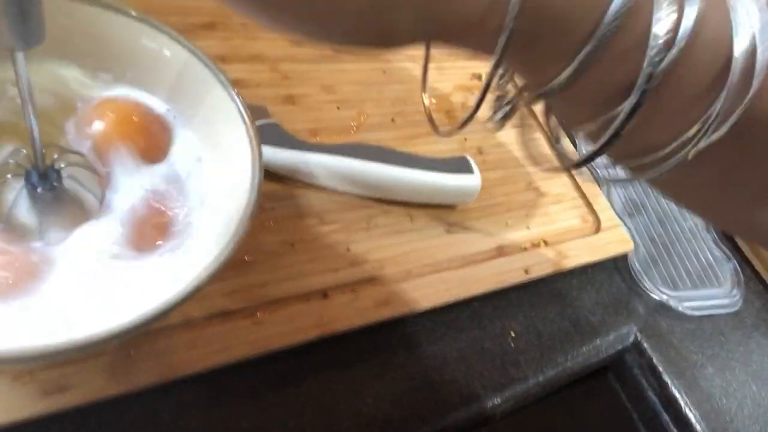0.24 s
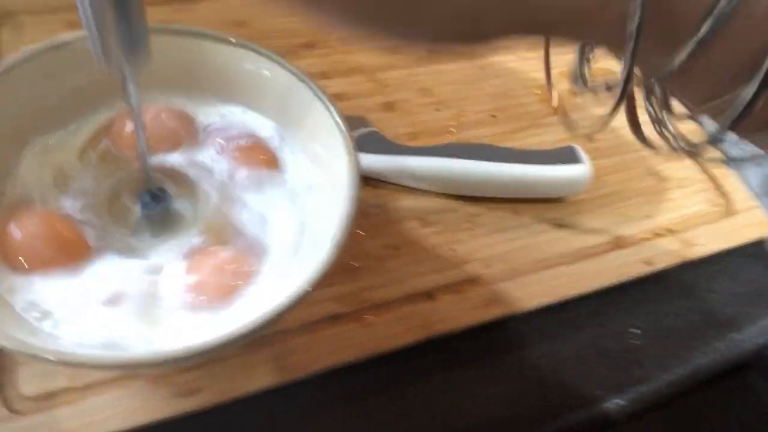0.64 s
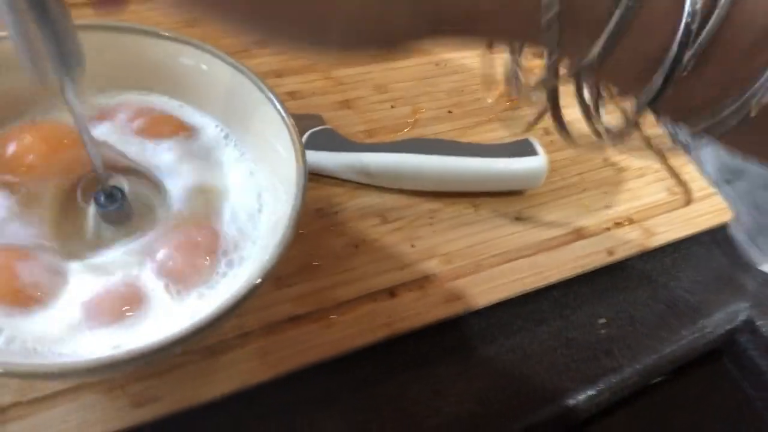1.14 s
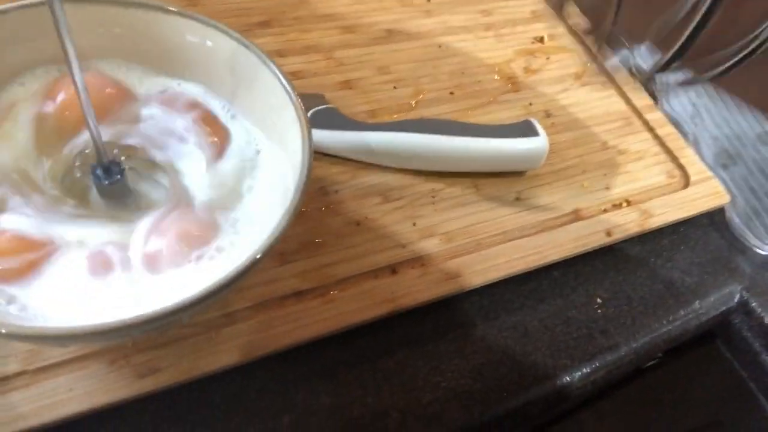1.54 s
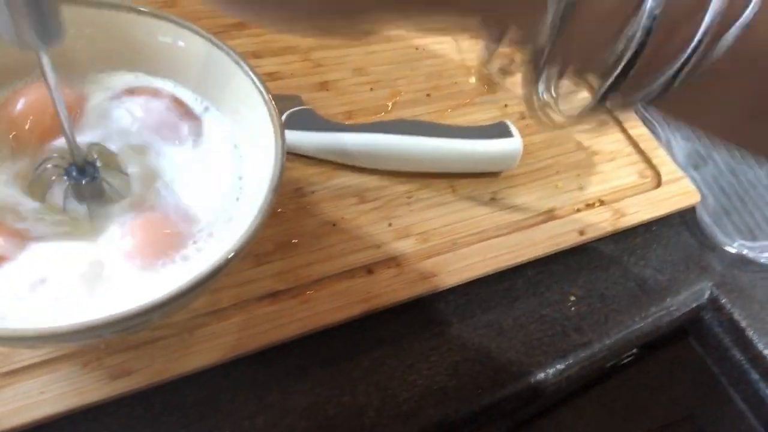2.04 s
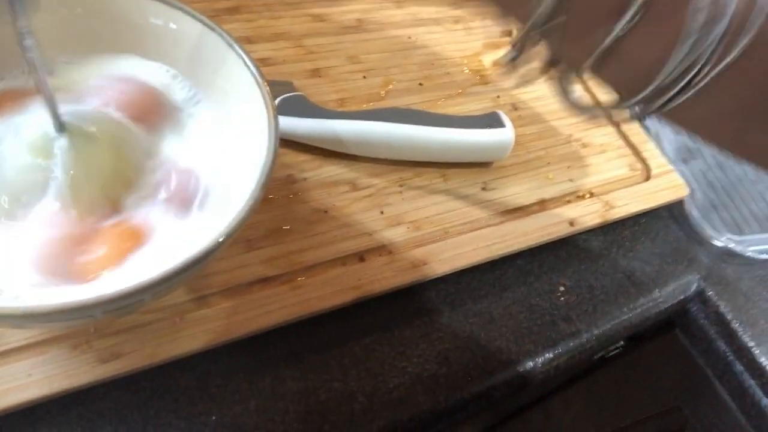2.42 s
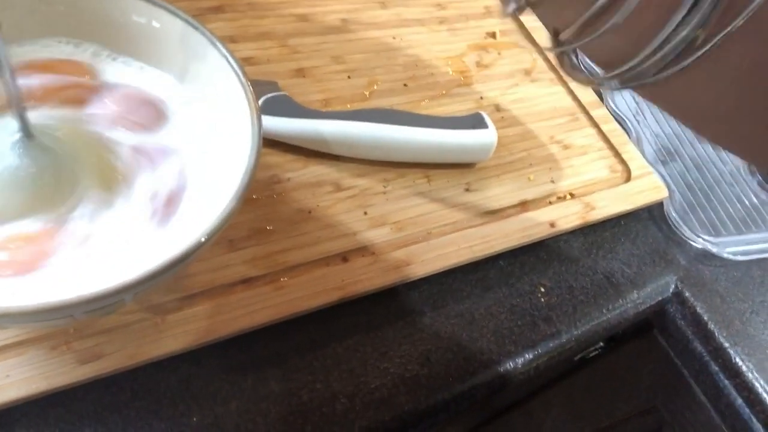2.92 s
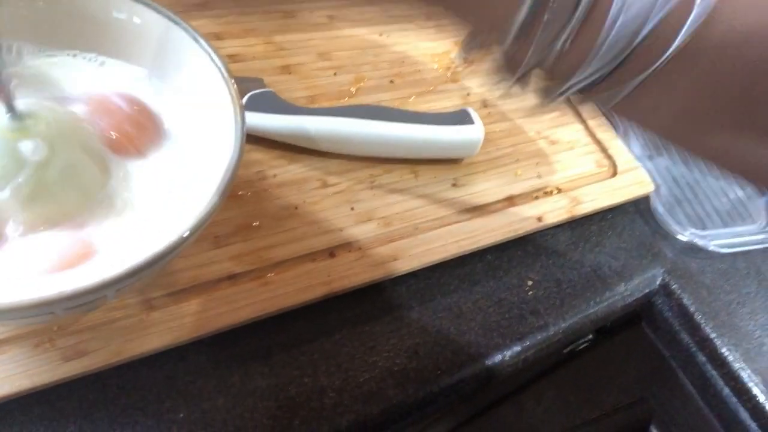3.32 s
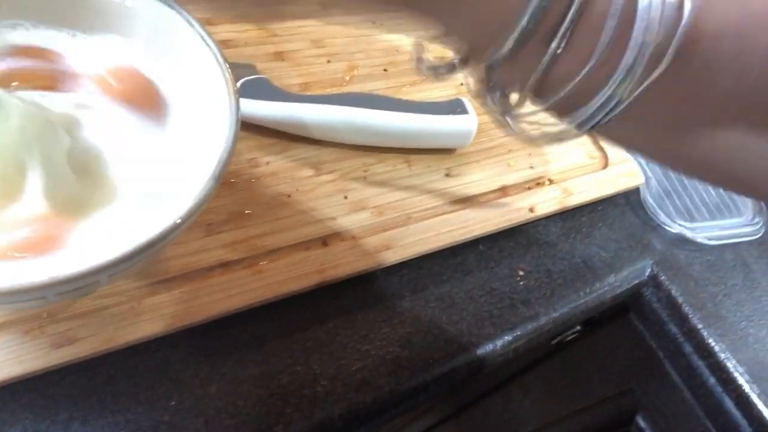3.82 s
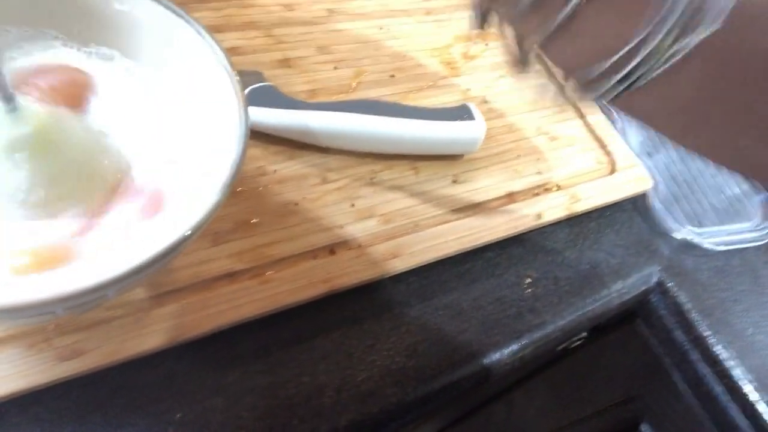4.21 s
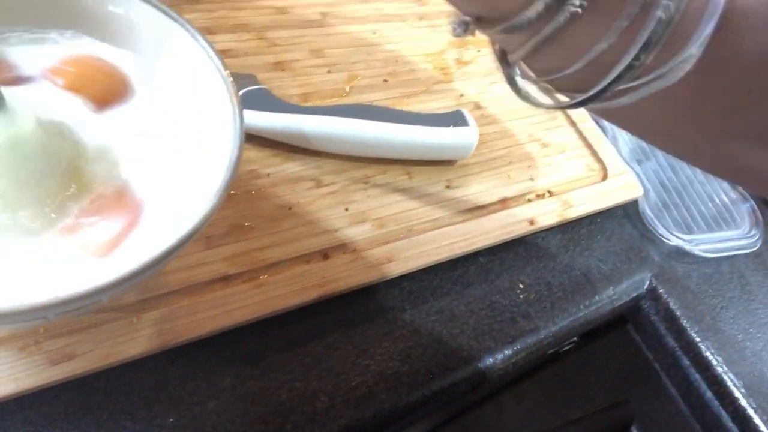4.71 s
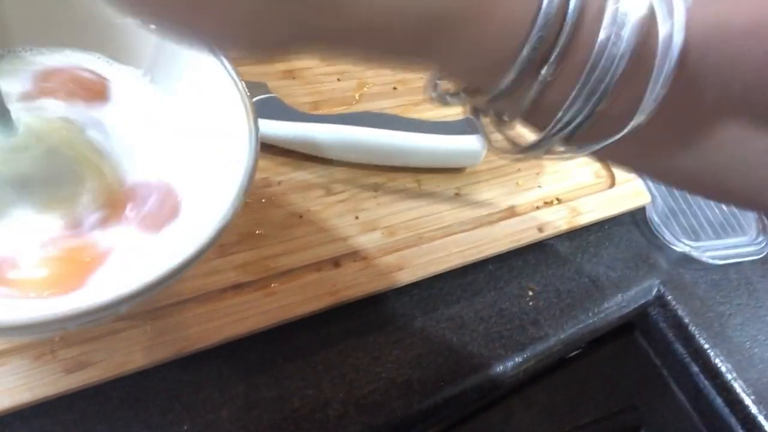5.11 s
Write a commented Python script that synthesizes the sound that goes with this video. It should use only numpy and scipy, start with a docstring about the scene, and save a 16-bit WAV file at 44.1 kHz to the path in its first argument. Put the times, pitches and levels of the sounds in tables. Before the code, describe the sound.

Wire whisk clacks in quickening rhythm against a pan of eggs and milk, with wet sloshing, hollow board knocks and faint bangle jingle.

```python
"""A faint knock and light clacks over wet sloshing open the scene, then the beating grows faster and harder.
Eggs and milk are beaten with a push-down whisk in a pan on a wooden board in a kitchen.
Wires clack as bursts of contacts through wall, rim and wire tones; the pan knocks as falling chirps.
The liquid is a patter of tiny noise snaps with a few rising bubble tones; thin metal bangles jingle on
the cook's wrist as randomly tapped high modes. A short room echo and a faint steady hiss lie behind it all."""
import sys
import numpy as np
from scipy import signal
from scipy.fft import rfft, irfft
from scipy.io import wavfile
from scipy.ndimage import uniform_filter1d

SR = 44100
rng = np.random.default_rng(int(sys.argv[2]) if len(sys.argv) > 2 else 0)


def int16_out(signal):
    """Quantize to a 16-bit WAV file."""
    q = np.round(np.clip(np.atleast_2d(signal).T, -1, 1) * 32767)
    wavfile.write(sys.argv[1], SR, q.astype(np.int16))


N = 236236


def undb(db):
    """Decibels to gain."""
    return 10 ** (np.asarray(db) / 20)


def unit(x):
    """Scale to rms 1."""
    return x / np.sqrt(np.mean(x ** 2) + 1e-20)


def burst(x):
    """Scale a short sound to the energy of 5 ms at rms 1."""
    return x / np.sqrt(np.sum(x ** 2) / (0.005 * SR) + 1e-20)


def curve(rows):
    """Join (s, value) rows by straight lines."""
    return np.interp(np.arange(N) / SR, *np.transpose(rows))


def add(out, s, x):
    """Mix x into out at time s."""
    i = max(int(s * SR), 0)
    out[i:i + len(x)] += x[:max(len(out) - i, 0)]


def gains(points, size):
    """Gain of a (Hz, dB) colour at the bins of a transform."""
    hz, db = np.transpose(points)
    bins_hz = np.fft.rfftfreq(size, 1 / SR)
    return undb(np.interp(np.log(bins_hz + 1), np.log(hz), db))


def colour(x, points):
    """Give a steady sound a colour."""
    return irfft(rfft(x) * gains(points, len(x)), len(x))


def impulse(points, size=4096):
    """The causal (minimum-phase) pulse that has this colour."""
    cepstrum = irfft(np.log(gains(points, size)))
    cepstrum[1:size // 2] *= 2
    cepstrum[size // 2 + 1:] = 0
    return irfft(np.exp(rfft(cepstrum)))


def band(x, lo_hz, hi_hz, order=2):
    """Causal band-pass."""
    sos = signal.butter(order, [lo_hz, hi_hz], "band", fs=SR, output="sos")
    return signal.sosfilt(sos, x)


def ring(hz, t60, size=4096):
    """One mode that fades by 60 dB in t60 seconds."""
    t = np.arange(size) / SR
    return np.sin(2 * np.pi * hz * t) * np.exp(-np.log(1000) * t / t60)


def disperse(x, lag_ms, corner_hz):
    """Bending waves: low tones travel slower, so a blow becomes a quick falling chirp."""
    hz = np.fft.rfftfreq(len(x), 1 / SR)
    phase = 2 * np.pi * lag_ms / 1000 * corner_hz * np.arctan(hz / corner_hz)
    return irfft(rfft(x) * np.exp(-1j * phase), len(x))


def chatter(ms, rebound=0.72, grit=0.083, count=7, size=4096):
    """Contact force: one wire lands, the others follow within a few ms and scrape a little."""
    age = np.arange(size) / SR * 1000 / ms
    force = grit * rng.standard_normal(size) * np.exp(-age ** 2)
    force[0] += 1
    late = rng.uniform(0.05, 1, count)
    force[np.searchsorted(age, late)] += rebound * rng.choice([-1, 1], count) * (1 - late / 2)
    return force


def walk(rate):
    """Random levels 1 / rate s apart, joined by straight ramps; spread near 1."""
    k = int(SR / rate)
    steps = np.repeat(rng.standard_normal(N // k + 1), k)
    return unit(uniform_filter1d(steps, k)[:N])


# Wires hit the pan. Each row: start in seconds, level in dB, rim in dB (relative),
# after-ring in dB (relative), wall pitch in Hz, wire pitch in Hz.
WIRE_CLACKS = [(0.152, -22, -13, -12, 1290, 4490), (0.35, -28, -12, -7, 1340, 4400),
               (0.574, -8.5, -7, -11, 1246, 5000), (0.931, -11.5, -4.5, -10.5, 1206, 4430),
               (1.162, -14, -5.5, -14, 1236, 4790), (1.411, -8.5, -7.5, -10.5, 1280, 4840),
               (1.646, -7, -8, -13, 1292, 4800), (1.885, -20.5, -26, -22, 1664, 4060),
               (2.129, -8.5, -22, -20, 1185, 5000), (2.36, -8, -1, -11.5, 1182, 5240),
               (2.591, -7, 4.5, -5.5, 1273, 4580), (2.824, -8.5, 5.5, -0.5, 1675, 4990),
               (3.029, -5, -4, -2, 1426, 5320), (3.406, -11, 1.5, -13, 1048, 5250),
               (3.604, -7.5, -1, -10.5, 1260, 5320), (3.782, -12, 0, -28, 1164, 5040),
               (3.974, -11, 1, -10, 1064, 5520), (4.098, -22.5, 0.5, -20, 1260, 4380),
               (4.128, -14.5, 0.5, -8, 1130, 5260), (4.259, -14.5, -4, -11, 1250, 4400),
               (4.456, -5, 0.5, -12, 1167, 4520), (4.621, -8.5, -0.5, -4.5, 1237, 4020),
               (4.692, -24, 3.5, -15, 1610, 4060), (4.767, -8, 0.5, -15, 970, 5110),
               (4.867, -23.5, -10, -11, 1330, 4610), (4.894, -25, -3, -5, 1280, 3840),
               (5.05, -14, -4, -24, 1263, 4600), (5.081, -10.5, -1, -4.5, 1200, 4800),
               (5.244, -7.5, -0.5, -12, 1180, 4580)]
# The spot of contact shifts the rim's pitch a little; scatters are in natural-log units.
RIM_HZ, RIM_SCATTER = 2135, 0.047
CHATTER_MS, CHATTER_SCATTER = 5.2, 0.15
# Wires and tick of a firm clack; weaker clacks stir the wires less, a ringing rim sharpens the tick.
FIRM_CLACK_DB, WIRE_DB, TICK_DB = -16, -4.5, -16
WIRE_DB_PER_DB, TICK_DB_PER_RIM_DB = 0.76, 0.4


def clacks():
    """Each contact drives the damped pan wall, its rim and the wires; the sprung wires rattle on after it."""
    out = np.zeros(N)
    for s, db, rim_db, after_db, pan_hz, wire_hz in WIRE_CLACKS:
        rim_hz = RIM_HZ * np.exp(RIM_SCATTER * rng.standard_normal())
        wire_db = WIRE_DB + WIRE_DB_PER_DB * min(db - FIRM_CLACK_DB, 0)
        tick_db = TICK_DB + TICK_DB_PER_RIM_DB * rim_db
        contact_ms = CHATTER_MS * np.exp(CHATTER_SCATTER * rng.standard_normal())
        force = chatter(contact_ms, rebound=0.81, grit=0.23)

        wall = burst(band(force, 762, 1820, order=3))
        wall += undb(-1.5) * burst(ring(pan_hz, t60=0.04))
        wall += undb(-4) * burst(band(force, 293, 1150))
        rim = burst(band(force, 0.87 * rim_hz, 1.22 * rim_hz))
        rim += undb(-3) * burst(ring(rim_hz, t60=0.034))
        wires = burst(band(force, 3705, 5614, order=3))
        wires += undb(-2.5) * burst(ring(wire_hz, t60=0.026))
        tick = burst(band(force, 7850, 10460))
        tick += undb(-27) * burst(band(force, 9700, 11400))

        clack = undb(-3.5) * burst(wall) + undb(rim_db - 8) * burst(rim) + undb(wire_db) * burst(wires)
        add(out, s, undb(db) * disperse(clack + undb(tick_db) * tick, lag_ms=2.51, corner_hz=684))

        # a dense train of faint recontacts repeats the clack's colour
        rattle = rng.standard_normal(len(force)) * np.exp(-np.arange(len(force)) / SR / 0.03)
        after = signal.fftconvolve(clack, rattle / np.linalg.norm(rattle))
        add(out, s + 0.0033, undb(db + after_db - 5.5) * band(after, 740, 4300, order=1))
        # the struck wire sings on under it
        add(out, s, undb(db + wire_db - 28.5) * ring(wire_hz, t60=0.26, size=SR // 4))
    return out


# The pan knocks on the board. Each row: start in seconds, relative level in dB.
BOARD_KNOCKS = [(0.043, -30.5), (0.258, -25), (0.463, -25.5), (0.627, -16.5), (0.771, -32), (0.959, -37),
                (1.517, -32), (1.756, -32), (1.983, -29), (2.228, -32.5), (2.456, -32), (2.672, -25.5),
                (2.863, -14), (3.23, -34), (3.295, -28), (3.472, -16.5), (3.663, -16), (3.853, -18),
                (4.017, -12.5), (4.185, -12.5), (4.34, -13.5), (4.499, -13.5), (4.658, -14.5), (4.815, -13),
                (4.977, -14), (5.134, -12.5), (5.297, -13.5)]
# Colour of a knock before its upper tones are rebalanced. Each row: frequency in Hz, level in dB.
KNOCK_COLOUR = [(30, -53), (70, -13.5), (120, 5), (180, -10), (260, 1.5), (420, 2), (580, 4), (780, -5.5),
                (1150, -1), (1500, -12), (2000, -24), (3500, -35.5), (8000, -34.5), (15000, -64)]
# Upper tones of a firm knock and the whisk's rattle; softer knocks are duller.
FIRM_KNOCK_DB, UPPER_DB, UPPER_DB_PER_DB = -13, 2, 0.4
RATTLE_DB, RATTLE_MS = -12.5, 6


def knocks(rock_db=-7, rock_s=0.003896):
    """A hollow chirp per knock, brighter when it lands hard; the pan rocks once and the whisk rattles with it."""
    out = np.zeros(N)
    lead = 256  # samples of room for the two-way low-pass
    thud = np.roll(impulse(KNOCK_COLOUR), lead)
    low = signal.sosfiltfilt(signal.butter(2, 850, fs=SR, output="sos"), thud)
    body, upper = burst(low), burst(thud - low)
    for s, db in BOARD_KNOCKS:
        upper_db = UPPER_DB + UPPER_DB_PER_DB * (db - FIRM_KNOCK_DB)
        # the pan never lands on quite the same spot
        lag_ms = 3.9 * rng.uniform(0.92, 1.08)
        rock = rock_s * rng.uniform(0.7, 1.5)
        blow = disperse(body + undb(upper_db) * upper, lag_ms, corner_hz=826)
        second = disperse(body, lag_ms, corner_hz=784)
        rattle = band(chatter(RATTLE_MS, rebound=0.6, grit=0.2), 1220, 3600)
        add(out, s - lead / SR, undb(db - 2.5) * blow)
        add(out, s - lead / SR + rock, undb(db + rock_db - 2.5) * second)
        add(out, s, undb(db + RATTLE_DB) * burst(rattle))
    return out


# Between the blows a wire now and then grazes the pan.
GRAZES_PER_S, GRAZE_DB, GRAZE_SCATTER_DB = 3, -41, 3


def grazes(lo_hz=1500, hi_hz=3600):
    """Faint wire ticks at random moments, each band shifted up to half an octave either way."""
    out = np.zeros(N)
    for when, force, spot in rng.random((int(GRAZES_PER_S * N / SR), 3)):
        shift = 2 ** (spot - 0.5)
        tick = burst(band(chatter(ms=3.5), lo_hz * shift, hi_hz * shift))
        add(out, when * N / SR, undb(GRAZE_DB + GRAZE_SCATTER_DB * (2 * force - 1)) * tick)
    return out


# Ring of the filled pan on its board. Each row: frequency in Hz, relative level in dB, t60 in seconds.
PAN_RING = [(118, -17, .3), (252, -21, .25), (345, -21, .12), (394, -18, .25), (524, -17, .4),
            (590, -16, .08), (660, -18, .08), (1023, -17, .2), (1130, -19, .1), (1228, -14, .22),
            (1464, -16, .22), (1660, -22, .15), (2121, -15, .26), (2505, -11, .22), (2690, -24, .15),
            (2820, -21, .15), (3640, -25, .15), (4330, -24, .15), (4505, -16, .2), (4730, -23, .15),
            (5200, -23, .15)]
# Nearby surfaces. Each row: delay in seconds, level in dB.
SURFACES = [(.0035, -42), (.0079, -14.5), (0.0116, -21)]


def pan(blows):
    """Every blow leaves the pan's own modes ringing, and comes back softened from nearby surfaces."""
    modes = sum(undb(db) * ring(hz, t60, size=SR // 2) for hz, db, t60 in PAN_RING)
    direct = blows + undb(-46) * signal.fftconvolve(blows, modes)[:N]
    out = direct.copy()
    soft = band(direct, 62, 6800, order=1)
    for s, db in SURFACES:
        add(out, s, undb(db) * soft)
    return out


# Stirring of the liquid, which also shakes the bangles. Each row: time in seconds, relative slosh level in dB.
STIRRING = [(0, -45), (0.6, -43), (1.3, -47), (2.0, -45), (2.5, -44), (2.9, -39), (3.3, -42), (3.9, -40),
            (4.2, -36), (5.36, -36)]
# Colour of the slosh. Each row: frequency in Hz, level in dB.
SLOSH_COLOUR = [(30, -22), (70, 7.5), (130, -1.5), (200, 5.5), (520, 5.5), (1200, -3), (2500, -11.5),
                (5000, -16), (8000, -13.5), (15000, -19)]
# Air pockets pop in the liquid. Each row: start in seconds, relative level in dB, starting pitch in Hz.
POPS = [(0.269, -40, 2190), (0.291, -32, 1630), (1.9974, -28, 1610), (4.4016, -32, 1300),
        (4.587, -36, 1730)]


def liquid(snaps_per_s=450, spread_db=3):
    """The swirl is a dense patter of wet snaps, each fading over a few ms; larger bubbles ring and rise in pitch."""
    out = np.zeros(N)
    t = np.arange(SR // 10) / SR
    for s, loud in rng.random((int(snaps_per_s * N / SR), 2)):
        snap = rng.standard_normal(400) * np.exp(-t[:400] / 0.002)
        # many quiet snaps, few loud ones
        add(out, s * N / SR, snap * undb(spread_db * min(-np.log(loud), 4)))
    out = unit(colour(out, SLOSH_COLOUR)) * undb(curve(STIRRING) - 3)
    for s, db, hz in POPS:
        bubble = np.sin(2 * np.pi * hz * t * (1 + 3.7 * t)) * np.exp(-t / 0.0052)
        add(out, s, undb(db + 7.5) * bubble)
    return out


# Ring of the bangles. Each row: frequency in Hz, relative level in dB.
HOOP_MODES = [(8274, -68), (8672, -71), (9604, -71), (10061, -68), (10864, -67), (12455, -60), (12640, -62),
              (13011, -58), (13438, -60), (13916, -62), (14772, -58)]
# A jerk of the wrist throws the bangles together. Each row: start in seconds, relative level in dB.
WRIST_JERKS = [(0.572, -42), (2.062, -53), (2.325, -51), (2.572, -53), (2.8, -47), (3.0, -44), (3.15, -51),
               (3.57, -42), (3.8, -44.5), (4.095, -45), (4.27, -49), (4.8, -38.5)]
JINGLE_RISE_S, JINGLE_HOLD_S, JINGLE_FADE_S = 0.014, 0.061, 0.027  # hold counts from the start
# The bangles never come to rest: level at the loudest slosh, how it follows the slosh, and its unevenness.
SHAKE_DB, SHAKE_DB_PER_DB = -46.5, 4
SHAKE_SWELL_DB, SHAKE_SWELLS_PER_S = 4.5, 16
# Ring time of a bangle, and the fine sizzle relative to its modes.
BANGLE_T60_S, SIZZLE_DB = 0.07, -19


def bangles(taps_per_s=80, count=40):
    """Thin hoops tap one another: random taps ring the listed modes and 40 more, swelling with each jerk."""
    extra = [(hz, -64) for hz in rng.uniform(11500, 15800, count)]
    out, stir = np.zeros(N), curve(STIRRING)
    for hz, db in list(HOOP_MODES) + extra:
        mode = ring(hz, BANGLE_T60_S)
        for s, force in rng.random((int(taps_per_s * N / SR), 2)):
            add(out, s * N / SR, undb(db) * force ** 3 * mode)
    follow_db = SHAKE_DB + SHAKE_DB_PER_DB * (stir - stir.max())
    shake = undb(follow_db + SHAKE_SWELL_DB * walk(SHAKE_SWELLS_PER_S))
    t = np.arange(SR // 2) / SR
    flurry = np.minimum(t / JINGLE_RISE_S, 1) * np.exp(-np.maximum(t - JINGLE_HOLD_S, 0) / JINGLE_FADE_S)
    for s, db in WRIST_JERKS:
        add(shake, s, undb(db + 1.5) * flurry)
    sizzle = band(rng.standard_normal(N), 10600, SR / 2 - 20)
    return (unit(out) + undb(SIZZLE_DB) * unit(sizzle)) * shake


# Colour of the kitchen's echo. Each row: frequency in Hz, level in dB.
ECHO_COLOUR = [(50, -44), (130, 9.5), (300, 4.5), (600, 1.5), (1200, -10), (2500, -5), (5000, -11),
               (8000, -3.5), (15000, -4)]


def kitchen(x, low_t60=0.44, high_t60=0.38, build_up_s=0.02):
    """The small, hard room fills within 20 ms and its noise-like echo dies away, the treble sooner."""
    t = np.arange(SR * 3 // 4) / SR
    low, high = rng.standard_normal((2, len(t)))
    fade = -np.log(1000) * t
    tail = band(low, 40, 1000) * np.exp(fade / low_t60)
    tail += band(high, 1000, 16000) * np.exp(fade / high_t60)
    echo = undb(-41) * colour(tail, ECHO_COLOUR) * np.minimum(t / build_up_s, 1)
    return x + signal.fftconvolve(x, echo)[:N]


# Colour of the steady hiss. Each row: frequency in Hz, level in dB per Hz (relative).
HISS_COLOUR = [(25, -24), (65, -18), (120, 12), (180, -5.5), (280, 1), (520, -25), (750, -20),
               (1200, -11.5), (2000, -14.5), (3300, -15.5), (7500, -13), (8500, -20), (12000, -22),
               (16000, -28)]


def hiss(level_db=-45):
    """A faint steady bed of coloured noise."""
    return undb(level_db) * unit(colour(rng.standard_normal(N), HISS_COLOUR))


def scene():
    """Whisk, pan, liquid and bangles in the kitchen, over the hiss."""
    blows = clacks() + knocks() + grazes()
    sources = pan(blows) + liquid() + bangles()
    return (kitchen(sources) + hiss())[None]


def record(dry):
    """Round the highest peaks, then cut the deep bass and everything above the top edge."""
    rounded = dry / (1 + dry ** 4) ** (1 / 4)
    thin = signal.sosfilt(signal.butter(3, 42, "high", fs=SR, output="sos"), rounded)
    top_hz = 15900
    return signal.sosfilt(signal.ellip(8, 0.2, 70, top_hz, fs=SR, output="sos"), thin)


dry = scene()
out = record(dry)
int16_out(out)
```